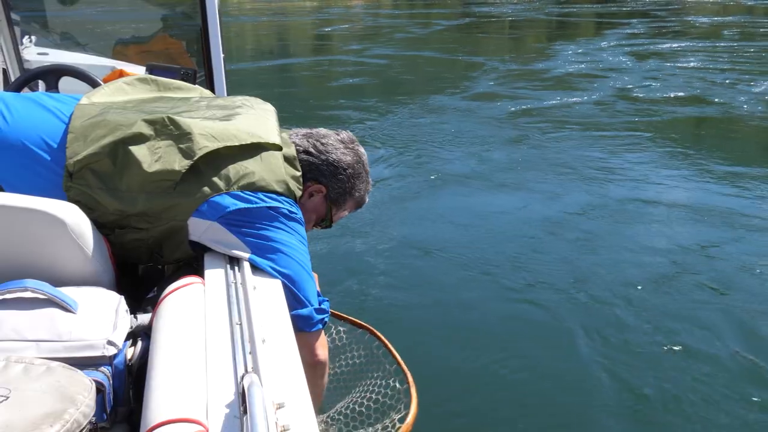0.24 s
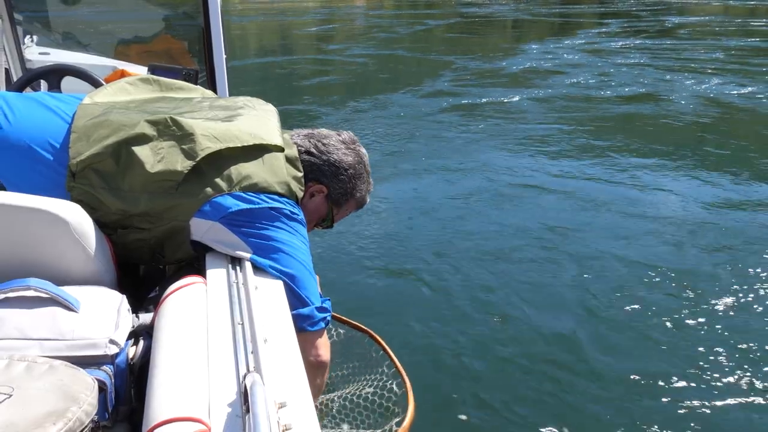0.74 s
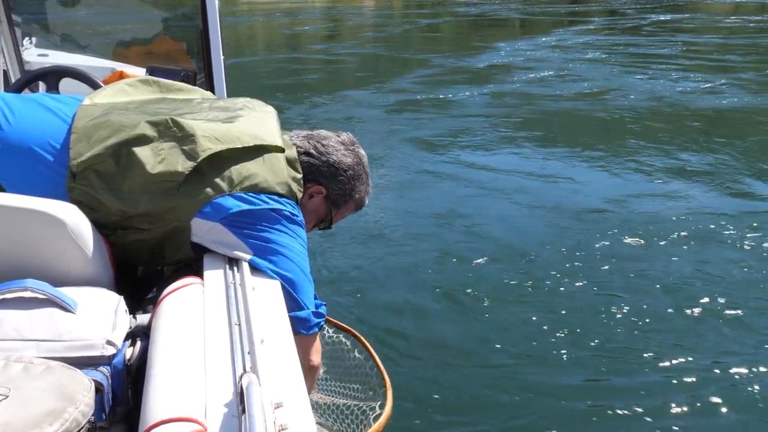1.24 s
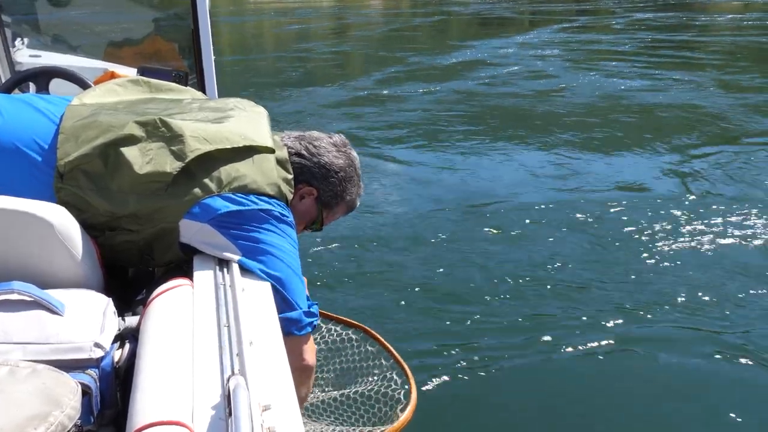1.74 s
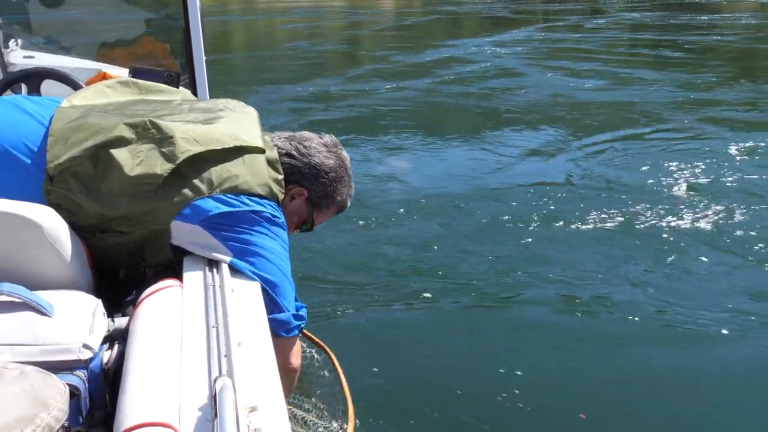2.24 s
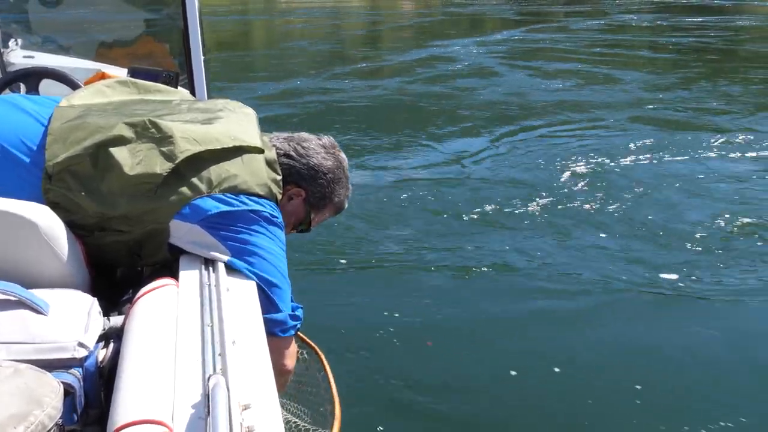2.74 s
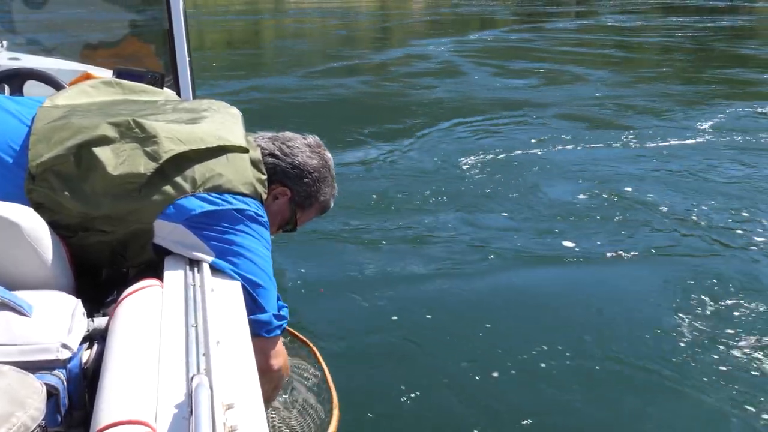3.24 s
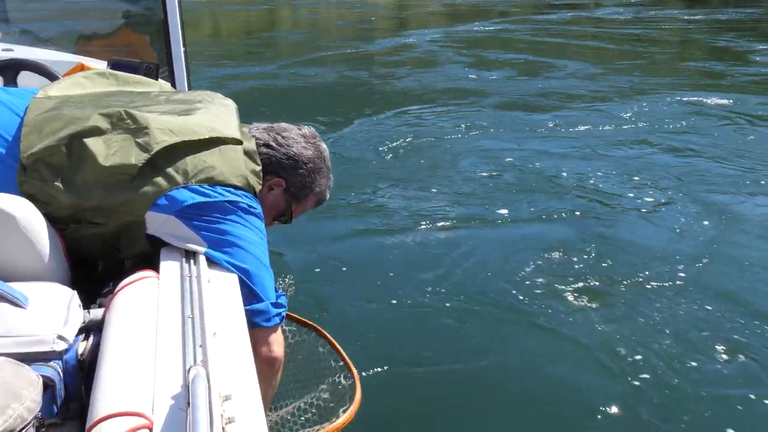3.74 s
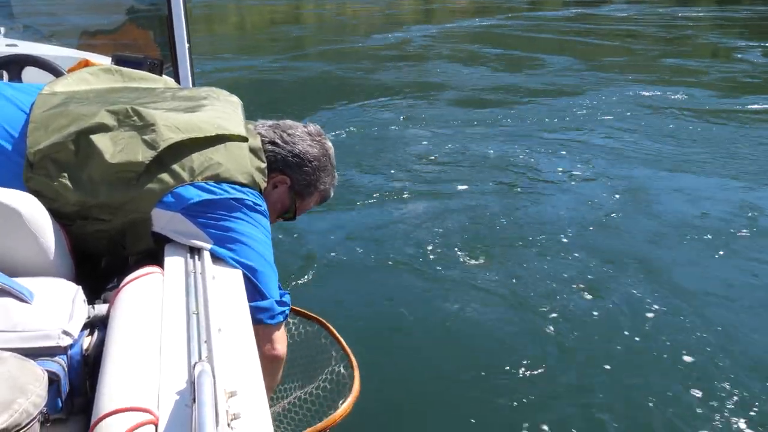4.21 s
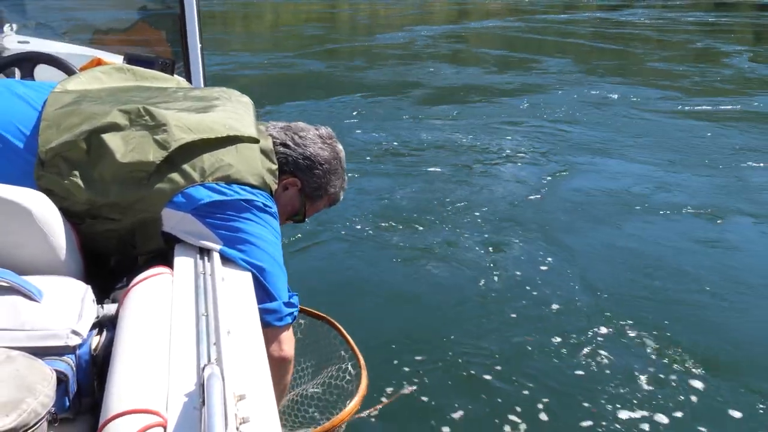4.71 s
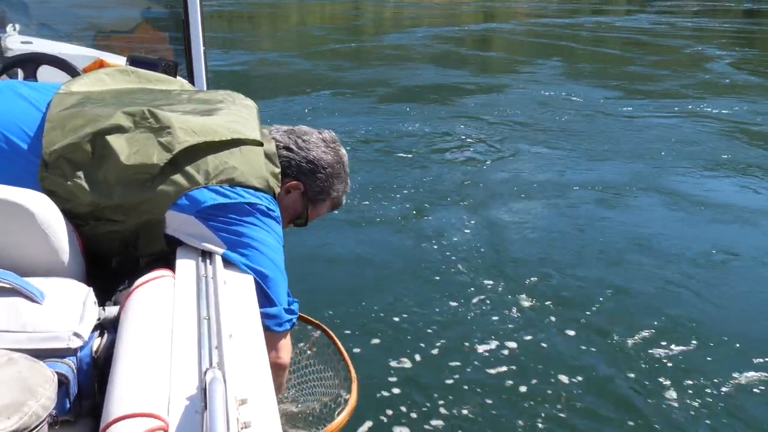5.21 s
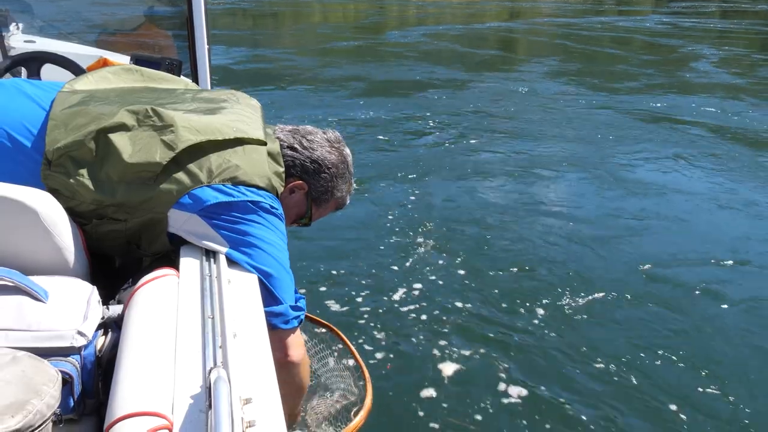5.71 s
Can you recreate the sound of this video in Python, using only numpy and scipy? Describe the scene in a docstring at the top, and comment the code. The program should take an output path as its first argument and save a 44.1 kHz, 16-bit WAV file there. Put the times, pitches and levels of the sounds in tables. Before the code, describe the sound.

Close watery lapping, bubbling and dripping beside a drifting boat, broken by dull thumps and one sharp hull knock near the end.

```python
"""Water washes along the hull of a drifting boat from the start, full of small bubbles from a landing net.
The wash is shaped noise that swells and drains; crowds of short, rising tones make the bubbles in the mesh.
Single tones plop and gulp, and dull or sharp blows ring the hull as a set of fading tones.
Drops tick close by as tiny spikes, and showers of fine drops crackle as scattered clicks.
Behind it all lie the river's steady hush and an uneven low rumble, both made of filtered noise."""
import sys
import numpy as np
from scipy import signal
from scipy.fft import rfft, irfft, next_fast_len
from scipy.io import wavfile
from scipy.ndimage import map_coordinates

SR = 44100
rng = np.random.default_rng(int(sys.argv[2]) if len(sys.argv) > 2 else 0)


def dump(signal):
    """Clip the signal to [-1, 1] and save it as 16-bit WAV at the path in sys.argv[1]."""
    limited = np.clip(np.atleast_2d(signal).T, -1, 1)
    pcm = np.round(limited * 32767).astype(np.int16)
    wavfile.write(sys.argv[1], SR, pcm)


N = 262836  # length of the scene [samples]

# Water breaking in the net: (time [s], bubbling before layer trims [dB], spray before layer trims [dB])
SPLASH_LEVELS = [(0.0, -52, -65), (0.18, -63, -67.5), (0.45, -62, -71), (1.16, -63.5, -68),
                 (1.56, -56, -64), (1.68, -58.5, -65), (1.91, -62.5, -69.5), (2.31, -62.5, -67),
                 (2.59, -67.5, -71.5), (3.27, -61.5, -68), (3.45, -57, -61), (3.64, -53, -60),
                 (3.8, -62, -72.5), (4.4, -62.5, -76), (4.93, -75.5, -79.5), (5.41, -77.5, -81.5),
                 (5.66, -83, -75.5), (5.96, -94, -82.5)]
# Wavelets that run along the hull: (arrival [s], level before layer trims [dB], hold [s])
HULL_WAVELETS = [(0, -50, 0.25), (2.114, -47.5, .33), (2.78, -57, 0.25), (3.296, -55, 0.18),
                 (3.72, -53.5, 0.17), (5.54, -57.5, 0.36)]
# Tone colour of the wash: (frequency [Hz], relative level [dB])
WASH_SPECTRUM = [(60, -25.5), (130, 0.5), (260, -3), (560, 2), (800, -8), (1500, -15), (2600, -37),
                 (5000, -53)]
# Tone colour of the spray: (frequency [Hz], relative level [dB])
SPRAY_SPECTRUM = [(900, -6.5), (2500, 3), (4000, -2.5), (6000, -11.5), (9000, -19.5), (16000, -50)]
# Small bubbles that pop at the surface: (time [s], level before fading [dB], starting pitch [Hz])
SMALL_BUBBLES = [(.251, -43, 2000), (.682, -44.5, 1010), (.851, -33, 990), (1.12, -48, 3900),
                 (1.339, -28.5, 939), (1.411, -43, 2780), (1.57, -42, 950), (1.5985, -41, 1080),
                 (1.844, -44, 813), (2.051, -41.5, 1810), (2.18, -43, 5700), (2.917, -42.5, 730),
                 (3.266, -43.5, 703), (3.367, -42, 700), (3.415, -42.5, 720), (3.489, -38.5, 704),
                 (3.549, -38.5, 800), (3.604, -34.5, 753), (3.757, -39, 1150), (3.985, -39.5, 556),
                 (4.03, -47, 1780), (4.286, -49.5, 1700), (4.325, -46, 625), (4.472, -40.5, 1070),
                 (4.601, -51, 2950), (4.714, -50.5, 1340)]
# Large air pockets gulped under the hull:
# (time [s], level before fading [dB], starting pitch [Hz], time scale [s], pitch rise in that time [octaves])
AIR_GULPS = [(.274, -43, 326, 0.02, .06), (.315, -45.5, 410, .035, 0.47), (1.357, -37, 443, 0.023, .08),
             (2.097, -33.5, 174, 0.015, .12), (2.122, -31.5, 193, 0.049, 0.13),
             (2.183, -35, 317, 0.031, 0.093), (2.186, -43, 584, 0.035, 0.2),
             (2.781, -40.5, 466, 0.066, 0.64), (2.958, -44.5, 630, 0.055, 0.074),
             (3.287, -45.5, 381, 0.042, 0.53), (3.697, -28.5, 355, 0.017, 0.51),
             (4.721, -53.5, 366.6, 0.11, 0.066)]
# Blows on the hull: (time [s], level before the contact filter [dB], contact cut-off [Hz])
HULL_KNOCKS = [(.751, -39.5, 413), (.876, -32, 197), (1.338, -31, 1510), (2.051, -45.5, 1200),
               (2.468, -40, 1770), (2.778, -37, 610), (2.967, -44, 1000), (2.99, -34, 300),
               (3.324, -45, 300), (3.413, -38, 393), (3.51, -38, 394), (3.788, -31, 2140),
               (4.952, -49.5, 580), (5.089, -36.5, 219), (5.116, -24, 2320), (5.157, -35, 890)]
# Tones of the hull's panels under an ideal hard blow, before softening and random variation:
# (frequency [Hz], relative level [dB], time to fade by 60 dB [s])
HULL_PANELS = [(146.2, -19, 0.72), (197.4, -14, 0.45), (261.6, -3.5, 0.27), (385, -12, 0.38),
               (439.4, -14, 0.29), (520, -14, 0.23), (570.4, -9, 0.29), (617, 1, 0.067), (782, -6.5, 0.12),
               (884.5, -7.5, 0.14), (986, -3, 0.11), (1037, 1.5, 0.025), (1164, -9.5, 0.093),
               (1263, -26, 0.058), (1408, -7, .11), (1490, -14, 0.064), (1704, -13, 0.024),
               (2035, -12, 0.063), (2550, -11.5, 0.035)]
# Drops landing close by: (time [s], level before trim and filter [dB])
DROP_TICKS = [(.1625, -43), (.647, -47), (0.8849, -44), (1.109, -44), (1.395, -49.5), (1.88, -45),
              (2.181, -41), (3.8218, -46.5), (4.0487, -46), (4.261, -52), (4.863, -50), (5.517, -40),
              (5.537, -40.5)]
# Showers of fine drops: (centre time [s], level at the centre [dB], half-length [s])
DROP_SHOWERS = [(0.196, -64.5, 0.011), (0.995, -70, 0.03), (1.7, -72.5, .08), (2.185, -70, .07),
                (2.924, -74.5, 0.13), (3.504, -65, 0.034), (5.524, -63, 0.017), (5.792, -74, .02)]
# Tone colour of the fine drops: (frequency [Hz], relative level [dB])
DROP_SPECTRUM = [(1500, -17.5), (6000, 0.5), (16000, -9.5)]
# Tone colour of the river's hush: (frequency [Hz], relative level [dB])
RIVER_SPECTRUM = [(20, 1), (200, 1.5), (560, 0), (800, -14.5), (1200, -12), (2000, -24.5), (5000, -24.5),
                  (16000, -24.5)]
# Low buffeting over time: (time [s], level before trim [dB])
RUMBLE_LEVELS = [(0, -65), (.9, -57.5), (2, -63), (3, -58.5), (3.95, -58), (4.5, -68), (5.96, -67.5)]
# Tone colour of the buffeting: (frequency [Hz], relative level [dB])
RUMBLE_SPECTRUM = [(25, 3.0), (100, -0.5), (170, -7), (350, -25.0), (1000, -73)]

WAVELET_RISE_S, WAVELET_FALL_DB_PER_S = 0.08, 66
LAPPING_DB = -4.5  # the wash between wavelets, relative to the bubbling
BUBBLE_CYCLES, BUBBLE_RISE = 7, 0.1  # time scale of a small bubble [cycles], pitch rise in that time [octaves]
# A soft, wet contact loads the panels: they sound lower and die sooner.
HARD_HZ, LOADING = 2460, 0.09  # cut-off of a hard contact; octaves of sinking per octave of softer contact
RING, DAMPING_HZ = 0.77, 1090  # largest share of the ring time; cut-off [Hz] below which the share shrinks
STRAY_DROPS_DB = -82  # single drops between the showers
TOP_HZ = 15900  # nothing is kept from here up


def amp(db):
    """Turn decibels into a gain."""
    return 10 ** (np.asarray(db) / 20)


def unit(x):
    """Scale a sound to an average (rms) level of 1."""
    return x / np.sqrt(np.mean(x ** 2) + 1e-20)


def curves(rows):
    """Join the points of each column after the time into one value per sample."""
    s, *columns = np.transpose(rows)
    return [np.interp(np.arange(N) / SR, s, column) for column in columns]


def wobble(rate):
    """Draw a smooth random curve through a given number of points a second."""
    return map_coordinates(rng.standard_normal(1024), [np.arange(N) * rate / SR], mode="wrap")


def filtered(x, response):
    """Multiply the spectrum of a sound by a gain that depends on frequency."""
    m = next_fast_len(len(x) + 8192)  # spare room for the filter's tail
    spectrum = rfft(x, m) * response(np.fft.rfftfreq(m, 1 / SR))
    return irfft(spectrum, m)[:len(x)]


def coloured(x, spectrum):
    """Shape a sound by (frequency [Hz], level [dB]) points and scale it to rms 1."""
    hz, db = np.transpose(spectrum)
    return unit(filtered(x, lambda f: amp(np.interp(np.log(f + 1), np.log(hz), db))))


def lowpass(x, hz, order):
    """Dull a sound above a cut-off frequency."""
    return signal.sosfilt(signal.butter(order, min(hz, SR / 2 - 1), fs=SR, output="sos"), x)


def add(track, s, sound):
    """Mix a sound into the track at a time in seconds."""
    part = track[round(s * SR):][:len(sound)]
    part += sound[:len(part)]


def water():
    """Wavelets churn along the hull and break into bubbles and fine spray in the net."""
    bubbling_db, spray_db = curves(SPLASH_LEVELS)
    surge_db = surge(bubbling_db)
    wash = amp(surge_db - 1.5 + 3.4 * wobble(25)) * coloured(rng.standard_normal(N), WASH_SPECTRUM)
    churn = amp(surge_db - 6.0) * swarm(rate=170, centre_hz=397, spread=0.382, cycles=6.6, rise=0.17,
                                        scatter_db=2.5)
    gurgle = amp(bubbling_db + 2.0) * swarm(rate=360, centre_hz=1108, spread=0.3775, cycles=6.13, rise=0.12,
                                            scatter_db=3.5)
    trickle = amp(spray_db + 1.5) * swarm(rate=900, centre_hz=2373, spread=0.423, cycles=5.2, rise=0.063,
                                          scatter_db=5.5)
    spray = amp(spray_db - 3.0 + 3.42 * wobble(60)) * coloured(rng.standard_normal(N), SPRAY_SPECTRUM)
    return wash + churn + gurgle + trickle + spray


def surge(bubbling_db):
    """Level of the wash in dB: each wavelet swells, holds and drains away, over lapping tied to the bubbling."""
    t = np.arange(N) / SR
    power = amp(bubbling_db + LAPPING_DB) ** 2
    for s, db, hold in HULL_WAVELETS:
        swell = np.exp(-(np.minimum(t - s, 0) / WAVELET_RISE_S) ** 2)
        drain_db = WAVELET_FALL_DB_PER_S * np.maximum(t - s - hold, 0)
        power = power + (swell * amp(db - drain_db)) ** 2
    return 10 * np.log10(power)


def swarm(rate, centre_hz, spread, cycles, rise, scatter_db):
    """Random bubbles at rms 1: each rings for a few cycles and climbs in pitch as it nears the surface."""
    count = int(rate * N / SR)  # rate is in bubbles per second
    when, size, life = rng.random((count, 3)).T[:, :, None]
    hz = np.clip(centre_hz * np.exp(spread * rng.standard_normal((count, 1))), 200, 12000)
    n = np.arange(int(min(1300, 4e6 / count)))  # samples per bubble, limited to save memory
    turns = hz * n / SR  # cycles since the bubble began
    age = np.minimum(turns / (cycles * (.5 + life)), 10)
    tone = np.sin(2 * np.pi * turns * (1 + rise * age / 2))
    ring = tone * np.exp(-age ** 2) * (1 - np.exp(-2 * turns))
    # a few bubbles stand out, and those above the central pitch are weaker
    gain = amp(scatter_db * np.minimum(-np.log(1 - size), np.pi)) * np.minimum(centre_hz / hz, 1)
    places = (when * N).astype(int) + n
    return unit(np.bincount(places.ravel(), (gain * ring).ravel(), N)[:N])


def plops():
    """Air pockets ring while closed and stop as they open; low ones have more of an overtone."""
    out = np.zeros(N)
    small = [(s, db, hz, BUBBLE_CYCLES / hz, BUBBLE_RISE) for s, db, hz in SMALL_BUBBLES]
    for s, db, hz, length, rise in small + list(AIR_GULPS):
        t = np.arange(int(2 * length * SR)) / SR
        age = t / length
        phase = 2 * np.pi * np.cumsum(hz * 2 ** (rise * age ** 2)) / SR
        overtone = amp(-6.5) * min(1, 200 / hz) ** 2 * np.sin(2 * phase)
        shape = (1 - np.exp(-t * hz / .5)) * np.exp(-.4 * age - age ** 4)
        add(out, s, amp(db) * shape * (np.sin(phase) + overtone))
    return out


def fading_noise(t, db, t60, top_hz):
    """A burst of dulled noise that fades by 60 dB in t60 seconds."""
    return amp(db - 60 * t / t60) * unit(lowpass(rng.standard_normal(len(t)), top_hz, order=6))


def knocks():
    """Each blow rings the hull's panels with a crack and a short rattle; softer contact is duller."""
    out, t = np.zeros(N), np.arange(SR // 2) / SR
    hz, level, t60 = np.transpose(HULL_PANELS)[:, :, None]
    sign = (-1) ** np.arange(len(HULL_PANELS))[:, None]
    for s, db, contact_hz in HULL_KNOCKS:
        pitch = (contact_hz / HARD_HZ) ** LOADING
        ring = RING * np.tanh(contact_hz / DAMPING_HZ)
        strength = sign * amp(level + rng.standard_normal(hz.shape))  # each blow excites the tones differently
        fade = amp(-60 * t / (t60 * ring))
        modes = (strength * fade * np.sin(2 * np.pi * hz * pitch * t)).sum(0)
        # the crowded upper modes blur into noise that dies the faster the higher it reaches
        crack = fading_noise(t, db=-1.5, t60=0.018, top_hz=4300)
        crack += fading_noise(t, db=-11.5, t60=0.052, top_hz=2930)
        rattle = fading_noise(t, db=-2.5, t60=0.2 * ring, top_hz=1207)
        add(out, s, amp(db) * lowpass(modes + crack + rattle, contact_hz, order=2))
    return out


def ticks():
    """A drop lands as a sharp spike with a dull push and a trace of fizz; each has its own brightness."""
    out, t = np.zeros(N), np.arange(SR // 40) / SR
    for s, db in DROP_TICKS:
        spike = np.exp(-t / .00005)
        push = 0.84 * np.exp(-t / 0.0006)
        fizz = amp(-8.0) * amp(-60 * t / 0.0096) * rng.standard_normal(len(t))
        brightness_hz = 12500 * 2 ** rng.uniform(-0.81, 0.19)
        add(out, s, amp(db + 4.0) * lowpass(spike + push + fizz, brightness_hz, order=1))
    return out


def showers():
    """Fine drops shaken from the mesh crackle in short clusters, with a few strays between."""
    t = np.arange(N) / SR
    clusters = sum(amp(db) * np.exp(-((t - s) / half) ** 2) for s, db, half in DROP_SHOWERS)
    level = amp(STRAY_DROPS_DB) + clusters
    drops = (rng.random(N) < 260 / SR) * rng.standard_normal(N)  # about 260 clicks a second
    return level * coloured(drops, DROP_SPECTRUM)


def river():
    """The open river's steady hush, with an uneven low buffeting beneath it."""
    rumble_db, = curves(RUMBLE_LEVELS)
    hush = amp(-65.5) * coloured(rng.standard_normal(N), RIVER_SPECTRUM)
    rumble = coloured(rng.standard_normal(N), RUMBLE_SPECTRUM)
    lumps = amp(2.5 * wobble(22))
    return hush + amp(rumble_db + 1.5) * lumps * rumble


def scene():
    """Add up all the sources in one channel, with no echo."""
    return (water() + plops() + knocks() + ticks() + showers() + river())[None]


def record(dry):
    """Cut off all sound from the upper frequency limit upward."""
    return np.array([filtered(x, lambda hz: hz < TOP_HZ) for x in dry])


dry = scene()
out = record(dry)
dump(out)
```